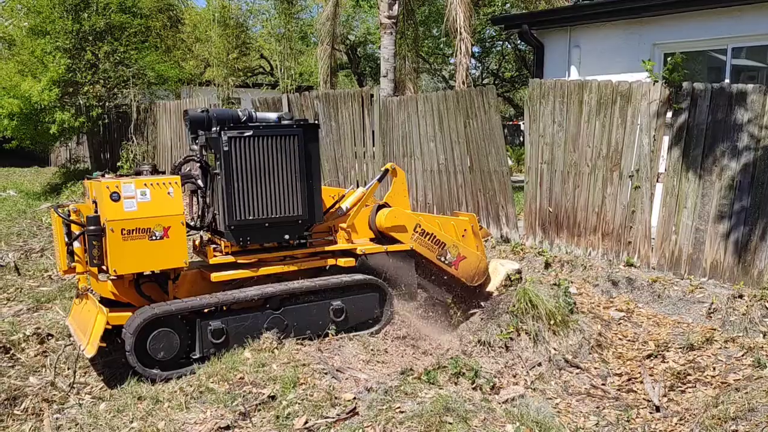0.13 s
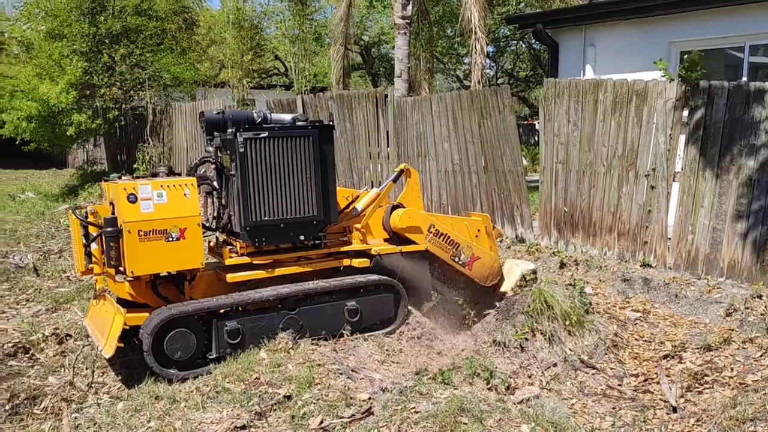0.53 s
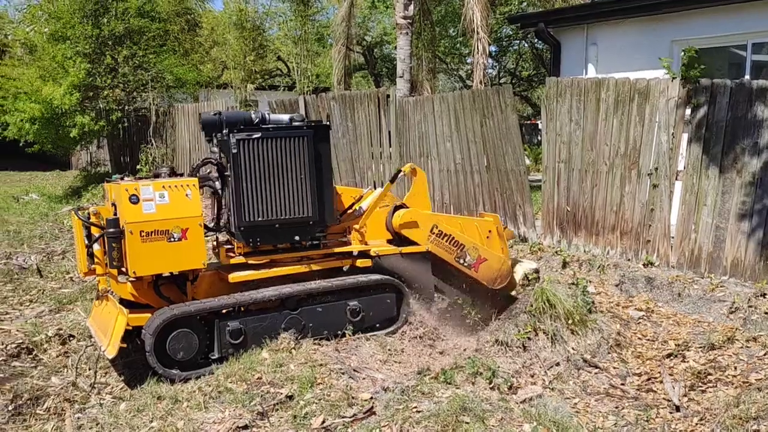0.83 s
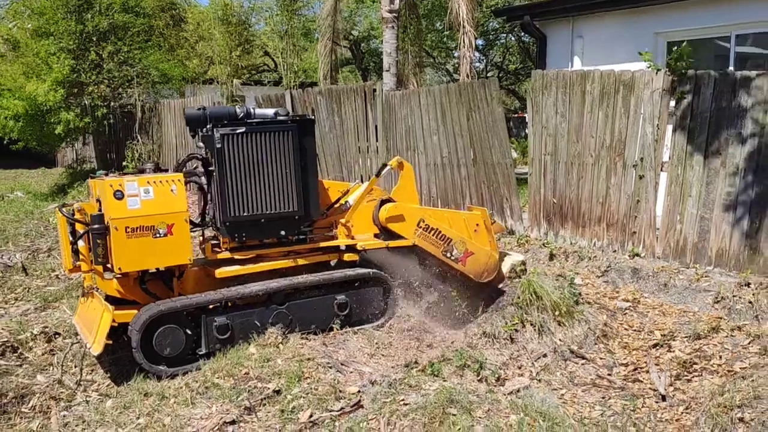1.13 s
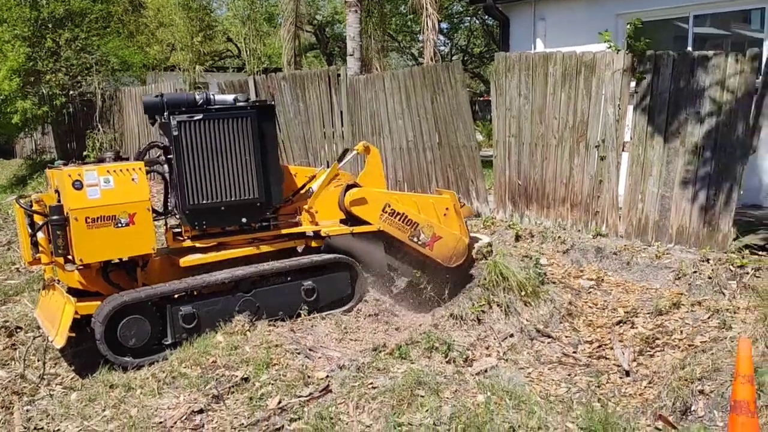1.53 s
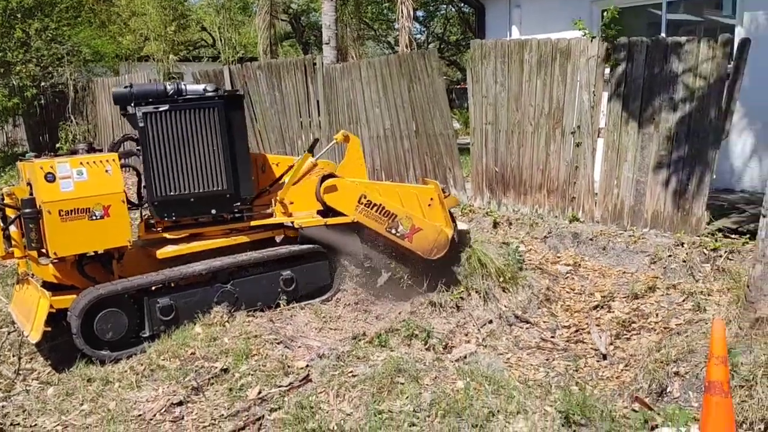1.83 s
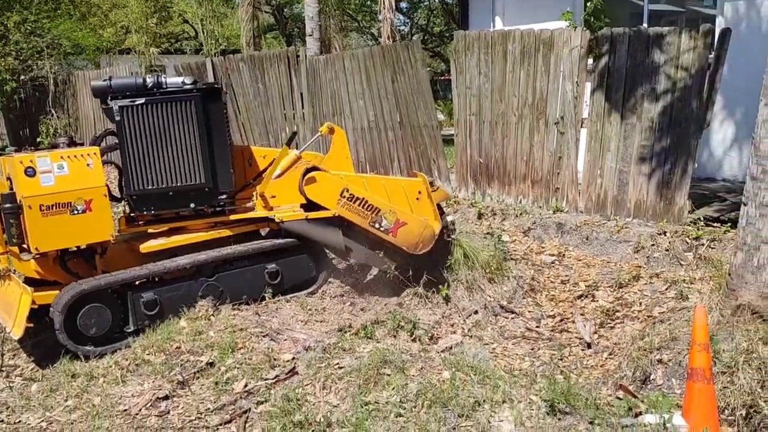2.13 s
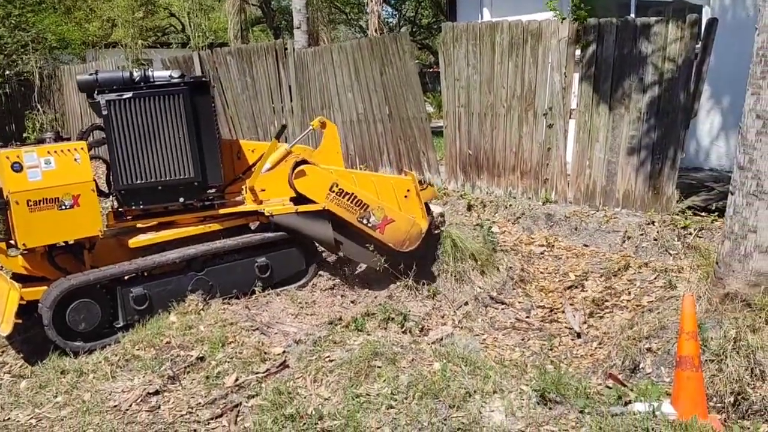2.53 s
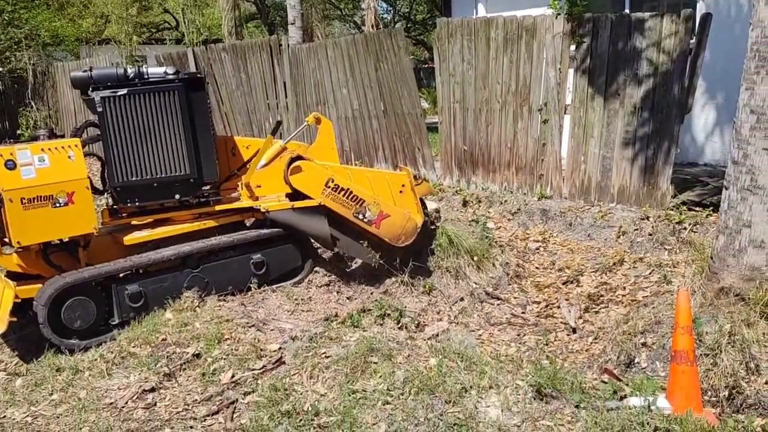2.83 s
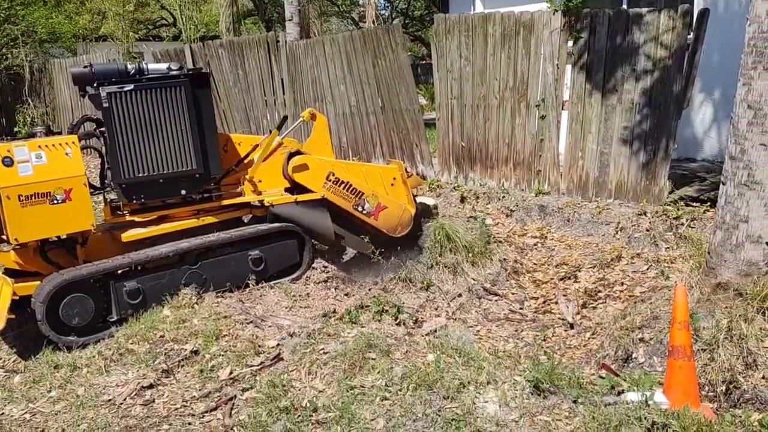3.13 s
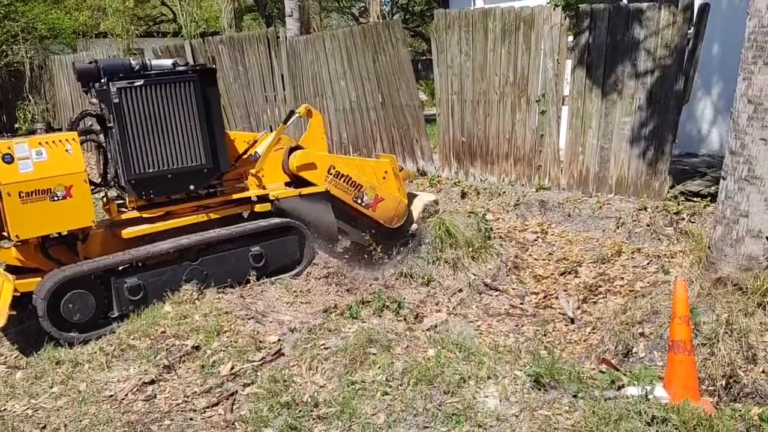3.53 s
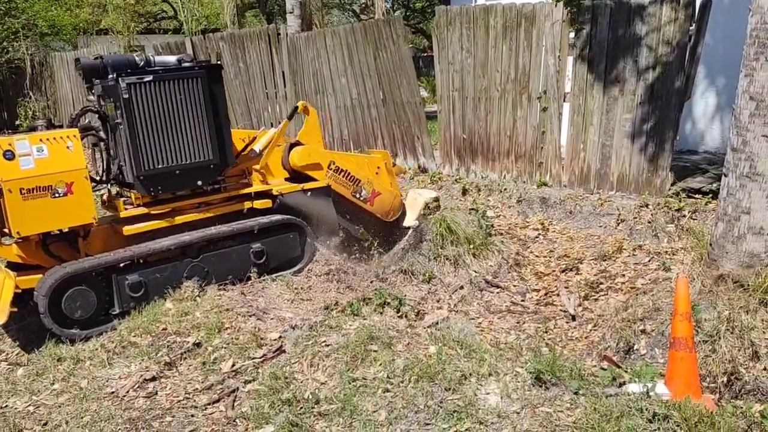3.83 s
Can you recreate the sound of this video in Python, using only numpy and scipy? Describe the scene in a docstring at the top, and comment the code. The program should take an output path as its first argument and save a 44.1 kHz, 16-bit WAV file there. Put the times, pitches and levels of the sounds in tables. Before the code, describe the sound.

A stump grinder, close in an open yard, fades in from silence at 0.2-0.35 s. Dense roar, diesel throb and a wavering hydraulic whine near 515 Hz with overtones continue to 4 s. Teeth scrape constantly; woody knocks cluster at 0.75-1.03 s, briefly around 1.6, then rattle densely from 3.1 to the end. Thin high whistles come before 1.65; faint metallic singing lies beneath. Dry, wide stereo, slightly saturated.

```python
"""Stump grinder cutting wood

A tracked stump grinder cuts close by, fading in from silence. A hydraulic drive whines (five wavering
partials) over diesel firings (wavering engine orders) and the roar of fan, exhaust and cutting (banded noise).
Wheel teeth scrape and ring (noise through resonators) and the wood knocks in bursts (decaying sines). A thin
whistle comes and goes (arched tones), and steel panels sing faintly (narrow noise)."""
import sys
import numpy as np
from scipy import signal
from scipy.fft import rfft, irfft
from scipy.io import wavfile
from scipy.ndimage import uniform_filter1d

SR = 44100
rng = np.random.default_rng(int(sys.argv[2]) if len(sys.argv) > 2 else 0)


def bounce(signal):
    """Save signal as a 16-bit WAV file at the path given by the first command-line argument."""
    frames = np.transpose(np.atleast_2d(signal))
    limited = np.clip(frames, -1, 1)
    pcm = np.round(limited * 32767).astype(np.int16)
    wavfile.write(sys.argv[1], SR, pcm)


N = 176400
T = np.arange(N) / SR

# roar of fan, exhaust and cutting before colouring; the 260 Hz column also drives the engine level:
# (time [s], level round 70, 260, 700, 1500, 2600, 4000, 5600 and 10000 Hz [dB])
ROAR_LEVELS = [(.3, -47, -24, -24, -17.5, -27, -27.5, -33.5, -29),
               (.45, -55, -21.5, -23, -14, -24.5, -24.5, -29, -28),
               (.71, -47, -22.5, -24, -19, -20.5, -27, -29, -27.5),
               (.74, -58, -27.5, -25.5, -22, -28.5, -30, -33, -29.5),
               (.89, -43, -24, -24.5, -22, -25.5, -28.5, -33, -27.5),
               (.92, -58, -26, -32.5, -21, -31.5, -32.5, -37, -30.5),
               (1.15, -57, -25.5, -25.5, -19, -30.5, -32, -33.5, -31),
               (1.6, -47, -26, -21, -19, -29, -30.5, -26, -27.5),
               (1.63, -49, -27.5, -25, -21.5, -31.5, -31.5, -31, -32),
               (2.05, -44, -25.5, -20, -20, -30, -31, -28.5, -30),
               (2.5, -41, -24, -22, -19.5, -29, -27.5, -28, -29),
               (3.05, -38, -21, -22, -19.5, -28, -29, -28, -29.5),
               (3.3, -45.5, -27, -24, -20.5, -32, -30, -25.5, -29),
               (3.35, -49, -25, -24.5, -23.5, -30.5, -31.5, -29, -29.5),
               (3.7, -48, -29, -26.5, -24, -30.5, -31, -29, -31),
               (3.85, -50, -25, -23.5, -23, -32, -31, -30.5, -31.5),
               (4, -44, -29.5, -28.5, -18.5, -29.5, -32, -28.5, -28.5)]
# clear tooth strikes, levels before the trims in teeth() and knocks():
# (time [s], strike level [dB], knock level [dB], knock pitch [Hz])
TOOTH_STRIKES = [(0.5428, -19, -17, 1660), (0.7557, -9, -14.5, 1880), (0.7931, -15, -17, 2170),
                 (0.8298, -14, -17, 1730), (0.843, -13, -20, 1550), (0.8645, -7, -16, 1450),
                 (0.8774, -20, -15, 1760), (0.8973, -12, -22, 1710), (0.9144, -16, -25, 2080),
                 (0.9354, -18, -20, 1850), (0.9504, -12, -19, 2040), (0.9742, -7, -18, 1720),
                 (0.9884, -19, -22, 2050), (1.01, -10, -19, 2250), (1.025, -18, -17, 1600),
                 (1.5439, -9, -14.5, 1680), (1.5784, -19, -17, 1840), (1.6514, -13, -16, 2060),
                 (1.6856, -12.5, -21, 1660), (3.1004, -14, -20, 1900), (3.1124, -13, -21, 1940),
                 (3.1336, -15, -20, 1500), (3.1504, -9, -22, 1310), (3.1845, -16, -16, 1680),
                 (3.2077, -10, -21, 1610), (3.2445, -7.5, -20, 2040), (3.2807, -12, -18, 1790),
                 (3.3154, -13, -26, 1640), (3.3284, -13, -26, 2060), (3.3645, -10, -29, 2050),
                 (3.389, -10, -16, 1870), (3.4022, -7.5, -17, 1890), (3.4274, -6.5, -14, 1660),
                 (3.4391, -10, -17, 1750), (3.4514, -12, -24, 1770), (3.458, -10, -17, 1890),
                 (3.474, -10, -16.5, 1910), (3.4947, -10, -17, 1920), (3.514, -13, -17, 1790),
                 (3.5355, -15, -16.5, 1510), (3.5474, -14, -15, 2200), (3.5707, -15, -16, 1840),
                 (3.588, -10, -24, 1460), (3.6084, -18, -10, 2010), (3.6234, -16, -18, 2100),
                 (3.6476, -14, -15, 1760), (3.662, -15, -15, 1460), (3.684, -11, -9.5, 2220),
                 (3.697, -20, -24, 1590), (3.7214, -22, -21, 1470), (3.735, -14, -24, 1460),
                 (3.7544, -19, -15, 1960), (3.77, -17, -17, 1880), (3.786, -22, -27, 1560),
                 (3.8062, -19, -21, 1470), (3.828, -18, -21, 1550), (3.8447, -20, -22, 1460),
                 (3.864, -17, -25, 1590), (3.8744, -19, -18, 1460), (3.902, -14, -20, 2390),
                 (3.9144, -14, -20, 2050), (3.938, -13, -20, 1530), (3.9524, -18, -16, 2070),
                 (3.9739, -10.5, -13, 2060), (3.9894, -13, -25, 2000)]


def undb(db):
    """dB to gain."""
    return 10 ** (np.asarray(db) / 20)


def curve(rows, axis=1):
    """One column of a table over time."""
    rows = np.array(rows)
    return np.interp(T, rows[:, 0], rows[:, axis])


def shape(rows, hz):
    """A table's second column over log frequency."""
    rows = np.array(rows)
    return np.interp(np.log(hz + 1), np.log(rows[:, 0] + 1), rows[:, 1])


def walk(rate):
    """Random levels held 1 / rate s and smoothed twice; standard deviation 1."""
    hold = int(SR / rate)
    steps = rng.standard_normal(N // 50)[:N // hold + 1]
    held = np.repeat(steps, hold)
    smooth = uniform_filter1d(uniform_filter1d(held, hold), hold)[:N]
    return smooth / smooth.std()


def ring(x, hz, t60):
    """A decaying mode as a two-pole resonator, peak near 1 for a unit click."""
    r = np.exp(-np.log(1000) / (t60 * SR))
    w = 2 * np.pi * hz / SR
    return signal.lfilter([.5, 0, -.5], [1, -2 * r * np.cos(w), r * r], x)


def ports(same, other):
    """Left and right microphone ports: a phase lead, a tilt, and a part heard on the right only."""
    # how far the left leads: (frequency [Hz], phase [rad])
    left_lead = [(0, 0), (1120, 0.35), (1380, 2.1), (1810, 1.17), (2070, 2.51), (3270, 1.4), (3530, 3.4),
                 (6030, 5.2), (8610, 6.2), (9470, 4.1), (10900, 6.2), (13600, 6.3), (15400, 2.8),
                 (16100, 5.7)]
    # left minus right: (frequency [Hz], level [dB])
    left_tilt = [(30, 10), (60, 6), (200, 1.3), (700, .5), (1300, -2), (2400, .6), (4400, 2.5), (7000, 0),
                 (8600, -.5), (9300, -6), (10000, 0), (11500, 3), (15000, 2)]
    # likeness of the two sides: (frequency [Hz], coherence [0-1])
    likeness = [(30, .05), (60, .25), (125, .62), (250, .92), (600, .98), (1000, .76), (2000, .62),
                (4000, .72), (8000, .27), (15000, .3)]
    hz = np.arange(N // 2 + 1) * SR / N
    alike = np.clip(shape(likeness, hz), 0, 1)
    tilt_gain = undb(shape(left_tilt, hz) / 2)
    left = rfft(same)
    right = alike * left * np.exp(-1j * shape(left_lead, hz))
    right = right + np.sqrt(1 - alike ** 2) * rfft(other)
    return np.array([irfft(left * tilt_gain, N), irfft(right / tilt_gain, N)])


def roar():
    """Fan, exhaust and cutting: noise bands on a level curve with sudden steps surge together, flicker alone."""
    # (centre of a level column [Hz])
    centres = [70, 260, 700, 1500, 2600, 4000, 5600, 10000]
    # colour added to those levels: (frequency [Hz], level [dB])
    colour = [(30, -30), (60, -8), (120, 3), (200, -5), (400, -1.5), (520, 7.5), (640, 4), (730, 0.5),
              (850, -3.5), (1050, -2), (1330, 0), (1800, 4), (2350, 9.5), (2700, 3), (3300, 5), (4100, 10),
              (5500, 6), (5800, 6), (6250, 2.5), (7400, 1.5), (8600, 1), (9300, 5), (10000, 1), (11500, 1),
              (13500, -4.5), (15500, 2)]
    flicker_db, surge_db = 0.5, 0.75
    hz = np.arange(N // 2 + 1) * SR / N + 1
    surge = walk(44.67)
    white = rfft(rng.standard_normal((2, N)))
    noise = white * undb(shape(colour, hz)) / np.sqrt(hz)  # equal power per octave before colouring
    levels = np.array([curve(ROAR_LEVELS, axis=k) for k in range(1, 9)])
    out = 0
    for mid in 25 * 2 ** (np.arange(29) / 3):
        # neighbouring third-octave bands overlap so that their amplitudes add up to one
        window = np.cos(np.pi / 2 * np.clip(3 * np.log2(hz / mid), -1, 1)) ** 2
        band = irfft(noise * window, N)
        # weights that interpolate the eight level columns at this band
        share = [np.interp(np.log(mid), np.log(centres), row) for row in np.eye(8)]
        out = out + band * undb(share @ levels + surge_db * surge + flicker_db * walk(18))
    return ports(*(out * np.sqrt(SR / 2)))


def whine():
    """Pump pistons give a steady tone with overtones; pressure ripple spreads a skirt round each."""
    # (time [s], pitch [Hz], partial 1 [dB], partial 2 [dB], partial 4 [dB])
    pump = [(0.27, 511.8, -22.5, -29.5, -33), (0.3, 511.8, -15, -39, -28), (0.33, 511.8, -25, -27, -41),
            (0.35, 512.0, -28, -29, -27), (0.39, 512.1, -23, -28, -24), (0.42, 512.8, -17.5, -26.5, -32),
            (0.72, 518.4, -21, -27.5, -32), (0.73, 517.4, -32, -48, -47), (0.75, 517.6, -19, -34, -25),
            (0.76, 517.6, -31, -31, -29), (0.85, 517.6, -19, -31.5, -35), (0.99, 517.5, -26, -38, -34),
            (1.02, 517.1, -17, -35, -36), (1.06, 517.2, -30.5, -41, -33), (1.21, 517.2, -23, -30.5, -34.5),
            (1.29, 517.0, -24, -36, -28), (1.3, 517.1, -25, -30, -54), (1.32, 517.8, -28, -23, -36),
            (1.43, 519.2, -21, -33, -31), (1.47, 519.1, -24, -24, -35), (1.52, 520.1, -15.5, -38, -38),
            (1.57, 519.6, -23.5, -26, -29), (1.61, 518.6, -14, -43, -53), (1.62, 518.2, -31, -39, -37),
            (1.7, 517.3, -21.5, -41, -29.5), (1.71, 517.1, -21, -29, -45), (1.73, 517.0, -23, -34, -36.5),
            (2.07, 514.1, -23, -32.5, -34), (2.17, 512.6, -15, -31, -29.5), (2.3, 512.3, -22, -36, -30),
            (2.46, 511.8, -17, -27.5, -27), (2.55, 511.8, -25, -33.5, -26.5),
            (2.66, 511.8, -12.5, -29, -31), (2.67, 511.8, -14, -32, -32.5),
            (2.84, 511.8, -18.5, -27.5, -28), (3.17, 512.4, -17, -33.5, -36),
            (3.18, 512.3, -16.5, -25, -49), (3.19, 511.9, -12, -30, -34), (3.5, 511.8, -23, -40, -44),
            (3.51, 512.1, -28, -51, -49), (3.53, 511.9, -18.5, -37, -36), (3.69, 513.1, -23, -29.5, -40),
            (3.84, 515.2, -20.5, -34, -38), (3.87, 515.0, -25, -26, -45), (3.9, 515.0, -17, -32, -36),
            (4.0, 519.5, -20.5, -32, -34)]
    # each partial at the ports: (left lead [rad], left minus right [dB])
    placement = [(.3, .3), (.9, -1), (1.8, 1.5), (1.9, -2), (2.0, -3)]
    third_db, fifth_db = -7, -9  # third against second partial, fifth against fourth
    skirt_db, skirt_rate = -15, 70  # rate in steps per second
    turn = 2 * np.pi * np.cumsum(curve(pump)) / SR
    first, second, fourth = [curve(pump, axis=k) for k in (2, 3, 4)]
    side = np.array([[.5], [-.5]])
    out = 0
    for k, level in enumerate([first, second, second + third_db, fourth, fourth + fifth_db]):
        ripple = 1 + undb(skirt_db) * (walk(skirt_rate) + 1j * walk(skirt_rate))
        lead, pan_db = placement[k]
        waver_db = 1.2 if k < 3 else 3
        size = np.sqrt(2) * undb(level + waver_db * walk(12) + pan_db * side)
        size = size / np.cos(lead / 2)  # makes up what the phase lead takes from the mono sum
        out = out + size * np.imag(ripple * np.exp(1j * ((k + 1) * turn + lead * side)))
    return out


def engine():
    """Diesel firings: multiples of the four-stroke cycle, each wavering as the firings differ."""
    # (time [s], engine cycles per second [Hz])
    cycle = [(.3, 21.8), (1.5, 21.85), (2.2, 21.75), (3.2, 21.75), (4, 21.7)]
    # (multiple of the cycle, level against the 260 Hz roar column [dB])
    orders = [(6, -19), (8, -11), (9, -12), (10, -11), (12, -16), (14, -10), (16, -16), (18, -12),
              (20, -11), (22, -15), (26, -13), (29, -11), (32, -13)]
    waver_db, phase_waver = 2.5, 0.34  # phase in rad
    turn = 2 * np.pi * np.cumsum(curve(cycle)) / SR
    out = 0
    for k, db in orders:
        gain = undb(db + waver_db * walk(4.94))
        phase = rng.uniform(0, 2 * np.pi) + phase_waver * walk(5.88)
        out = out + gain * np.sin(round(k) * turn + phase)
    out = out * undb(curve(ROAR_LEVELS, axis=2))
    return out * undb([[.5], [-.5]])  # left 1 dB louder


def teeth():
    """Each tooth digs in, scrapes harder until it lets go, and rings the wheel and guard."""
    # modes of cutter wheel and guard: (frequency [Hz], level [dB], t60 [s])
    wheel_modes = [(3880, -9, .006), (5900, -5, .003), (7200, -4, .004), (8900, -5, .002),
                   (10300, -8, .002), (11600, -7, .003), (14000, -12, .0015)]
    teeth_per_s, steady_db, scatter_db = 82, -28, 3.5
    strike_trim_db, scrape_s = 1.5, .0045
    bite = rng.standard_normal((int(4 * teeth_per_s), 2))
    steady_times = (np.arange(len(bite)) + .08 * bite[:, 0]) / teeth_per_s
    steady = np.c_[steady_times, steady_db + scatter_db * bite[:, 1]]
    clear = np.array(TOOTH_STRIKES)[:, :2] + [0, strike_trim_db]
    rows = np.r_[clear, steady]
    hit = np.zeros(N)
    hit[np.clip((rows[:, 0] * SR).astype(int), 0, N - 1)] = undb(rows[:, 1])
    along = np.linspace(0, 1, int(scrape_s * SR))
    contact = along * (1 - along) ** .5  # slow rise, quick release
    push = signal.fftconvolve(hit, contact)[:N] / np.linalg.norm(contact)
    sides = []
    for noise in rng.standard_normal((2, N)):
        scrape = push * noise
        sides.append(sum(undb(db) * ring(scrape, hz, t60) for hz, db, t60 in wheel_modes))
    return ports(*sides)


def whistle():
    """Thin tones that rise a little, hold and sag, with a fluttering level."""
    # (start [s], end [s], pitch at the top of the arch [Hz], level [dB])
    tones = [(.32, .76, 5660, -33), (1.14, 1.64, 5635, -32), (.24, .95, 4110, -32)]
    bend, right_db = .02, -6  # bend as a fraction of the pitch
    out = 0
    for start, end, hz, db in tones:
        arch = np.sin(np.pi * np.clip((T - start) / (end - start), 0, 1)) ** .25
        pitch = hz * (1 - bend * (1 - arch) + .0015 * walk(30))
        tone = np.sin(2 * np.pi * np.cumsum(pitch) / SR)
        out = out + arch * undb(db + 3.3 * walk(24.8)) * tone
    return out * undb([[0], [right_db]])


def panels():
    """Chips and shaking keep narrow steel resonances alive; each flickers and drifts a little."""
    # panels and guard that sing: (start [s], end [s], frequency [Hz], t60 [s], level [dB])
    resonances = [(.25, 1.65, 705, .06, -30), (1.7, 4.2, 705, .05, -35), (1.7, 3.15, 2745, .05, -43),
                  (1.7, 3.15, 4220, .03, -39), (1.7, 3.15, 5015, .04, -42), (1.65, 3.1, 5550, .06, -41),
                  (1.65, 3.2, 6066, .05, -41), (1.7, 3.2, 6440, .04, -47), (3.42, 3.62, 1915, .08, -33),
                  (3.5, 4.1, 1460, .1, -34), (3.3, 4.2, 5475, .05, -42)]
    flicker_db, drift = 2.5, .002  # drift as a fraction of the pitch
    out = 0
    for start, end, hz, t60, db in resonances:
        on = np.clip(np.minimum(T - start, end - T) / .05, 0, 1)
        r = np.exp(-np.log(1000) / (t60 * SR))
        # slow complex noise on a carrier makes a resonance as narrow as its t60 implies
        slow = signal.lfilter([np.sqrt(1 - r * r)], [1, -r], rng.standard_normal((2, 2, N)))
        carrier = np.exp(2j * np.pi * np.cumsum(hz * (1 + drift * walk(8))) / SR)
        tone = np.imag((slow[0] + 1j * slow[1]) * carrier)
        out = out + on * undb(db + flicker_db * walk(27.08)) * tone
    return ports(*out)


def knocks():
    """The wood rings briefly under each clear strike, as decaying modes at that strike's own pitch."""
    # modes of the wood: (multiple of the knock pitch, level [dB], t60 [s])
    wood_modes = [(.78, -5, .012), (1, 0, .013), (1.27, -3, .009), (1.6, -7, .007), (1.95, -7, .009)]
    knock_trim_db, rise_s = 12., .0015
    out = np.zeros((2, N + SR))
    t = np.arange(SR // 20) / SR
    phases = rng.uniform(0, 2 * np.pi, (len(TOOTH_STRIKES), 2, len(wood_modes)))
    rise = np.minimum(t / rise_s, 1)
    for (start, _, db, hz), phase in zip(TOOTH_STRIKES, phases):
        note = 0
        for j, (k, rel_db, t60) in enumerate(wood_modes):
            decay = undb(rel_db - 60 * t / t60)
            note = note + decay * np.sin(2 * np.pi * hz * k * t + phase[:, [j]])
        first = int(start * SR)
        out[:, first:first + len(t)] += undb(db + knock_trim_db) * rise * note
    return ports(*out[:, :N])


def scene():
    """All parts of the machine together."""
    return roar() + whine() + engine() + teeth() + whistle() + panels() + knocks()


def record(dry):
    """The lowest bass is cut, peaks are rounded, the sound fades in from silence and the top is cut."""
    left_start_s, right_start_s = .192, .1765  # the left channel opens a moment after the right
    bass_cut_hz, top_hz = 35, 15550
    ramp_s, fade_power = 0.18, 1.82
    # the ramp is already a fifth of the way up when the right channel opens
    ramp = np.clip((T - right_start_s) / ramp_s + 0.2, 0, 1) ** fade_power
    fade = ramp * (T > np.array([[left_start_s], [right_start_s]]))
    bass_cut = signal.butter(2, bass_cut_hz, "high", fs=SR, output="sos")
    top_cut = signal.ellip(10, .2, 80, top_hz, fs=SR, output="sos")
    rounded = np.tanh(0.74 * signal.sosfilt(bass_cut, dry)) / 0.66
    return signal.sosfilt(top_cut, fade * rounded)


dry = scene()
out = record(dry)
bounce(out)
```